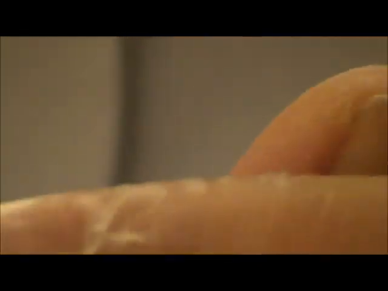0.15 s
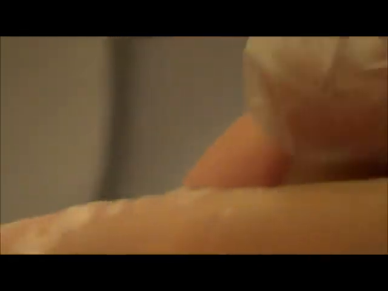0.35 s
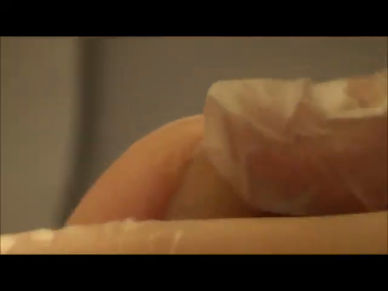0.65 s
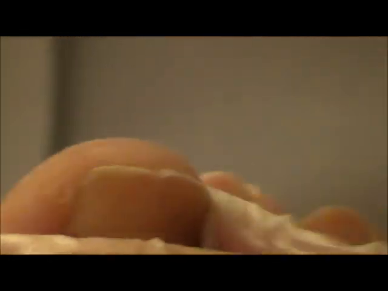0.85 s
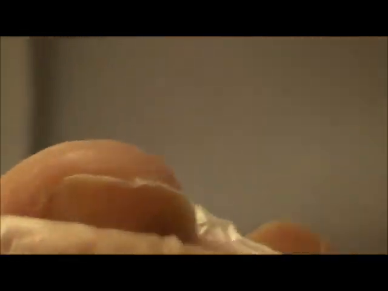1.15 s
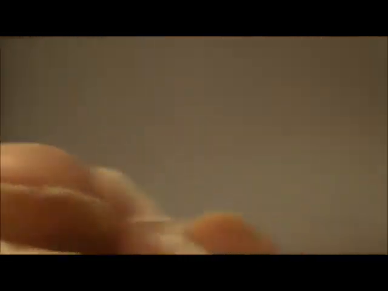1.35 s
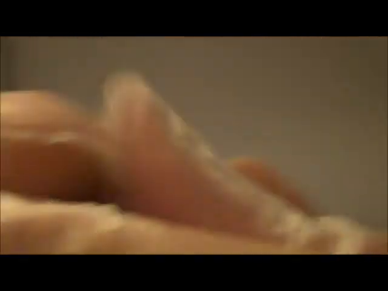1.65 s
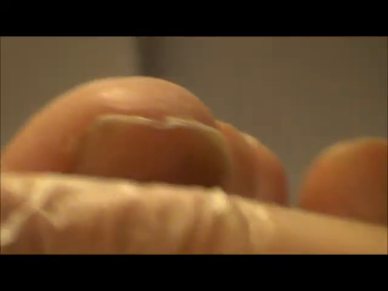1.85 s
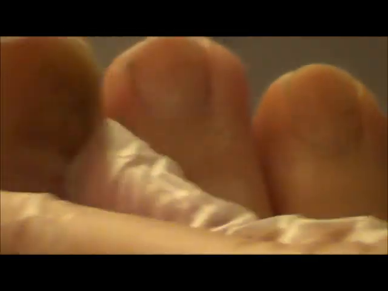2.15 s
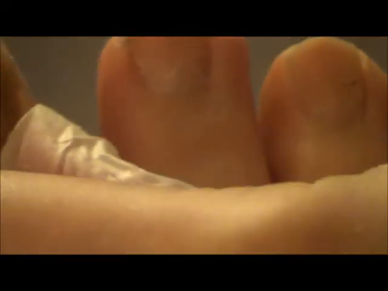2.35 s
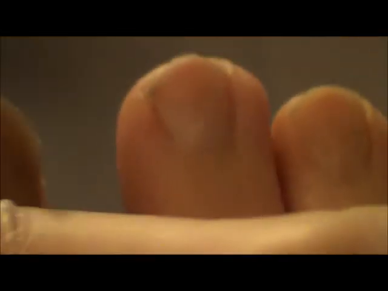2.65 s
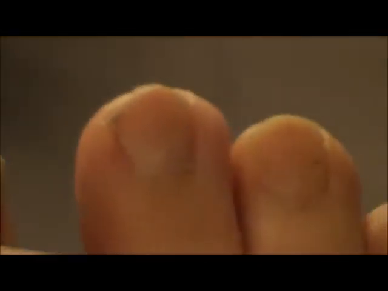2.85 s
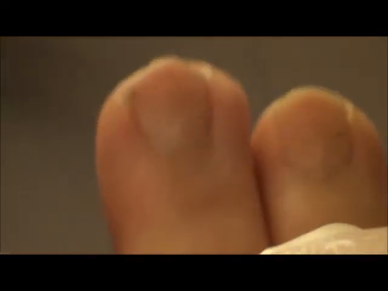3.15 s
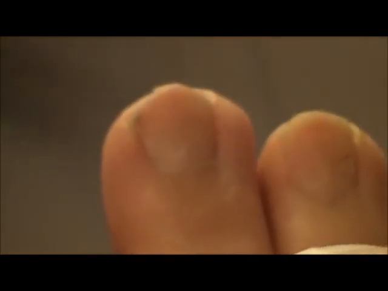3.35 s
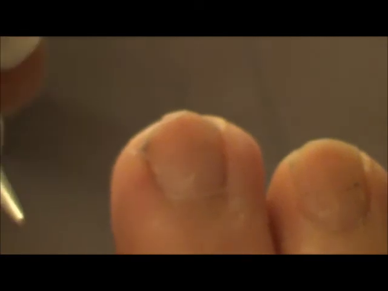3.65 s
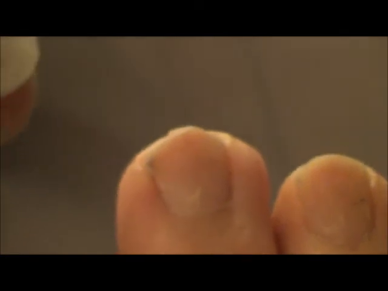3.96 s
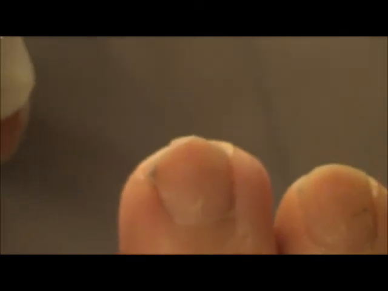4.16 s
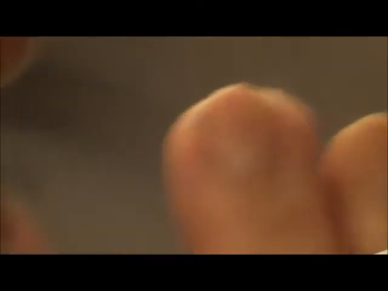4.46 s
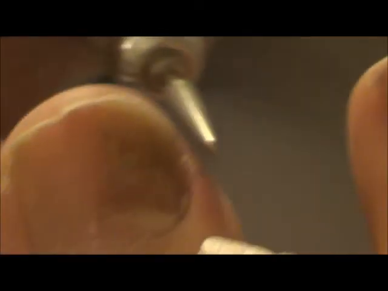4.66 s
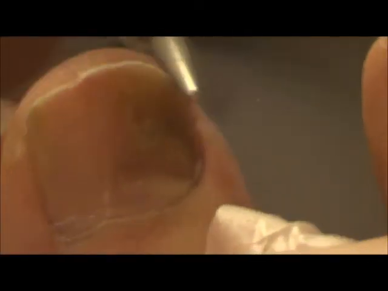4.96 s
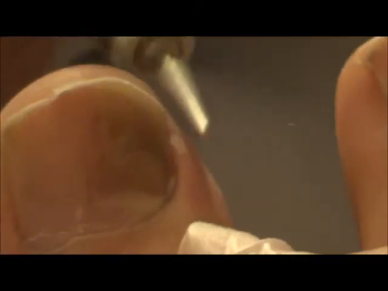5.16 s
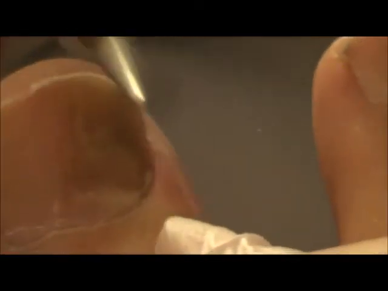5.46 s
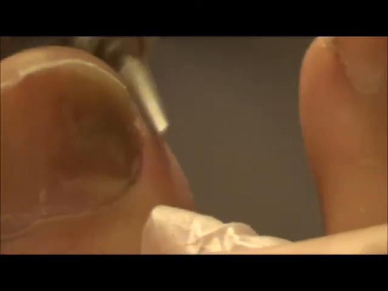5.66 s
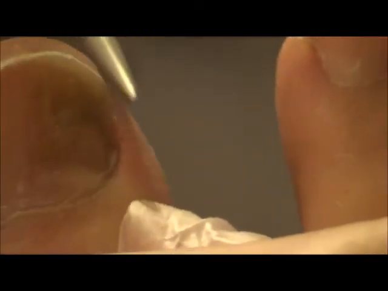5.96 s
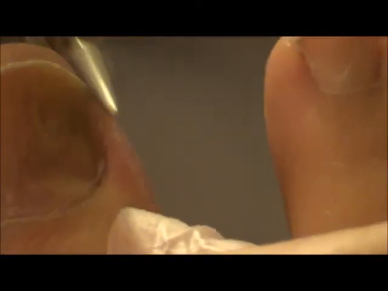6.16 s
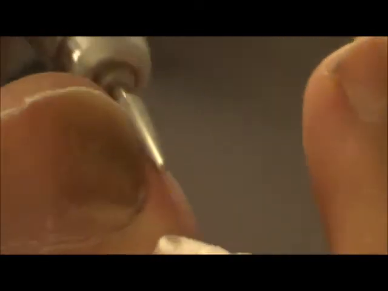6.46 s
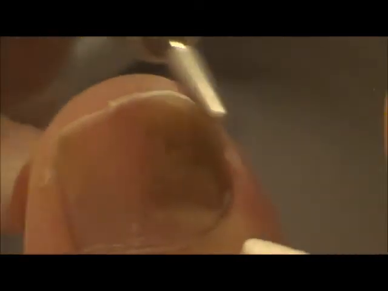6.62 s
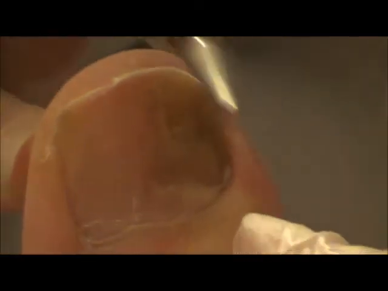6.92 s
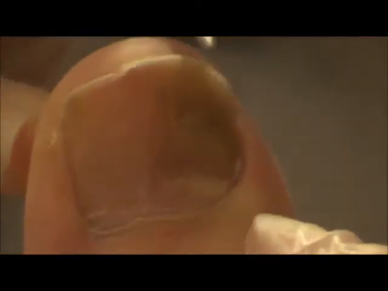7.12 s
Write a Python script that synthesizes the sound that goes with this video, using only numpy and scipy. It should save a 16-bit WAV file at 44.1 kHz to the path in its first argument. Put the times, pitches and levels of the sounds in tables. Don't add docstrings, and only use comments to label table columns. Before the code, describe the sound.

A small electric nail drill runs free close to the microphone in a quiet indoor room, a thin, bright, hissing whine wavering slightly in colour. A loud sharp tick briefly ducks the level before three seconds. From just after four seconds the burr strokes a toenail seven times, each adding a gritty rasp while the motor sags and recovers. Faint room rumble lies beneath.

```python
import sys
import numpy as np
from scipy import signal
from scipy.fft import rfft, irfft, next_fast_len
from scipy.io import wavfile
from scipy.ndimage import uniform_filter1d, map_coordinates

SR = 44100
rng = np.random.default_rng(int(sys.argv[2]) if len(sys.argv) > 2 else 0)


def persist_wave(psi):
    counts = np.round(np.clip(psi, -1, 1) * 32767).astype(np.int16)
    wavfile.write(sys.argv[1], SR, np.atleast_2d(counts).T)


def amplitude_ratio(level_db):
    exponent = np.asarray(level_db, float) / 20
    return 10 ** exponent


N = 321489
T = np.arange(N) / SR

# multiple_of_shaft_rate, held_free_db, stroking_db
LOW_ORDERS = [(1, -64.0, -61.0), (2, -66.0, -60.0), (3, -41.0, -37.0), (4, -54.0, -49.0), (5, -36.0, -39.5),
              (6, -48.0, -44.0), (7, -37.5, -36.0), (8, -61.0, -49.0), (9, -40.0, -44.0),
              (10, -47.0, -43.0), (11, -35.0, -43.5), (12, -38.0, -42.0), (13, -34.5, -31.5),
              (14, -35.0, -36.0), (15, -31.0, -30.0), (16, -46.5, -42.0), (17, -37.5, -43.0),
              (18, -44.0, -52.0), (19, -43.0, -44.0), (20, -45.0, -50.0), (21, -41.0, -39.0)]
# multiple_of_shaft_rate, held_free_db, stroking_db
HIGH_ORDERS = [(22, -49.0, -48.0), (23, -41.0, -42.0), (24, -44.0, -42.0), (25, -37.0, -38.5),
               (26, -46.5, -44.0), (27, -42.0, -41.0), (28, -44.0, -47.0), (29, -38.0, -38.0),
               (30, -37.0, -42.0), (31, -32.0, -38.0), (32, -35.0, -42.0), (33, -38.0, -38.0),
               (34, -55.0, -45.0), (35, -54.0, -49.0), (36, -50.0, -48.0), (37, -56.0, -52.0),
               (38, -54.0, -54.0), (39, -51.0, -52.0), (40, -49.0, -50.0), (41, -47.0, -52.0),
               (42, -49.0, -52.0)]
# multiple_of_shaft_rate, per_turn_db, per_tilt_db, per_roll_db
BEAMING = [(3, -2.7, -5.2, 0.7), (5, 4.5, -0.8, -0.9), (6, -2.0, 4.5, 0.1), (7, 4.2, -1.0, 1.0),
           (9, 2.6, -2.1, 0.7), (10, -2.1, 0.9, 0.8), (11, 3.4, -0.0, 0.5), (12, 1.4, 2.9, -1.7),
           (13, -1.2, -2.8, -1.5), (14, 0.5, -1.8, 2.3), (15, -1.8, -0.2, -0.9), (16, -0.3, 1.2, -0.9),
           (17, -0.9, -0.1, 0.2), (18, 1.2, 1.7, 0.8), (19, 2.4, 0.9, 0.2), (20, 1.6, -0.5, 1.5),
           (21, -0.7, 0.4, 0.5), (23, -3.2, -0.4, 3.4), (24, 2.6, 0.2, 2.9), (25, 2.3, -2.2, -2.7),
           (26, 1.5, 0.1, -0.9), (27, -0.1, -1.1, -0.0), (28, 1.2, 2.0, 1.7), (29, 0.4, 3.3, -1.3),
           (30, 0.7, -0.6, -0.3), (31, 2.2, -0.5, -0.2), (32, -0.7, -0.2, 1.6), (33, -0.8, -2.0, -2.5)]
# multiple_of_ball_pass_rate, sideband_in_shaft_rates, level_db
FRONT_BEARING = [(1, -1, -48.0), (1, 0, -39.0), (1, 1, -38.0), (1, 2, -38.0), (1, 3, -47.0), (1, 4, -55.0),
                 (1, 5, -53.0), (2, -2, -52.0), (2, 0, -42.0), (2, 1, -47.0), (2, 2, -48.0), (2, 3, -48.0),
                 (2, 4, -44.0), (2, 5, -51.0), (4, -3, -52.0), (4, -2, -48.0), (4, -1, -55.0),
                 (4, 0, -47.0), (4, 1, -49.0), (4, 2, -48.0), (4, 3, -50.0), (4, 4, -52.0), (4, 5, -55.0),
                 (5, -3, -53.0), (5, -2, -49.0), (5, -1, -54.0), (5, 0, -51.0), (5, 1, -55.0)]
# multiple_of_shaft_rate, level_db
REAR_BEARING = [(9.27, -61), (13.27, -48), (14.27, -47)]
# time_s, shaft_hz, then turn, tilt, roll in typical swings
WRIST_PATH = [(0.0, 366.21, 1.06, -0.64, -1.57), (0.3, 365.97, 1.12, -0.41, -1.53),
              (0.55, 366.24, 0.67, -0.34, -0.49), (0.75, 367.12, -0.24, 0.49, 1.68),
              (1.05, 366.93, -0.0, 0.15, 1.56), (1.4, 366.11, 1.01, 0.51, 1.07),
              (1.65, 365.55, 1.52, 0.31, -1.46), (1.85, 366.22, 1.54, 1.05, 0.73),
              (2.05, 366.5, 0.02, 2.08, -1.16), (2.25, 366.53, -0.7, 1.63, -0.66),
              (2.45, 366.0, -2.23, 0.87, -0.04), (2.7, 365.74, -1.47, 0.19, -0.71),
              (2.95, 366.63, -0.79, -0.67, 0.42), (3.2, 367.56, -1.37, -0.76, -0.77),
              (3.4, 367.51, -0.21, -2.18, -1.11), (3.65, 367.08, 0.31, -1.23, 0.75),
              (4.05, 367.15, 0.24, -0.96, 1.64)]
# touch_s, firmest_s, lift_s, rasp_db
STROKES = [
    (4.275, 4.435, 4.555, -20),
    (4.805, 4.965, 5.075, -21),
    (5.33, 5.445, 5.545, -21),
    (5.715, 5.85, 5.915, -20.5),
    (6.075, 6.2, 6.285, -21),
    (6.46, 6.55, 6.655, -21),
    (6.85, 6.945, 7.105, -21.5),
]
# slowest_s, half_length_s, sag_hz
SAGS = [
    (4.463, .317, 16),
    (4.985, .281, 14.3),
    (5.458, .262, 17.7),
    (5.843, .233, 16.6),
    (6.215, .231, 19.2),
    (6.589, .204, 20.4),
    (7.018, .283, 22.9),
]
# frequency_hz, density_db
HISS_COLOUR = [(290, -57), (500, -14.5), (1110, -6), (1360, -7), (1570, -4.5), (1720, -6), (1900, -1.5),
               (2610, -9.5), (2850, -4.5), (3200, -4), (5310, -3), (5880, -10), (11300, -12), (13300, -17),
               (16000, -17)]
# centre_hz, width_hz, lift_db
SHELL = [(1055, 313, 8.5), (2980, 340, -8)]
# frequency_hz, density_db
RASP_COLOUR = [(470, -55), (800, -52), (929, -23), (1030, -11), (1120, -38), (1380, -20), (1610, -36),
               (1800, -1), (2450, -7), (2920, -9), (3030, -8.5), (4690, -1), (6250, -6.5), (10400, -5),
               (15700, -15.5)]
# centre_hz, width_hz, lift_db
NAIL_EDGE = [(11830, 1600, 8.5), (13600, 1106, -3.5), (11000, 490, 6)]
# start_s, peak_db, ring_hz, brightness_db
TICKS = [
    (2.7217, -.5, 4740, -3),
    (4.5144, -8, 2220, -6),
]
# frequency_hz, density_db
ROOM_COLOUR = [(15, -47), (25, -3), (65, -10), (255, -3.5), (335, -5), (361, -0.5), (395, -4), (525, -6),
               (600, -9), (900, -11), (1170, -37), (1980, -120)]
# frequency_hz, side_minus_mid_db
WIDTH = [(60, -55), (120, -23), (250, -26), (600, -16), (1290, -27.5), (2380, -20), (4400, -18),
         (8120, -14.5), (11900, -21), (12600, -45)]

BALL_PASS = 4.3435
STROKES_FROM_S, SETTLE_S = 4.05, .06
RESTING_HZ, TIRING_HZ_PER_S, FULL_SAG_HZ, SAG_SHARPNESS = 363.1, -.43, 18, 3.5


def whine(turns, pose):
    busy = stroking()
    beams = {int(round(order)): beam for order, *beam in BEAMING}
    load_lift_db = 2 * sag() / FULL_SAG_HZ
    out = 0
    for order, free_db, stroke_db in [*LOW_ORDERS, *HIGH_ORDERS]:
        order = int(round(order))
        spread_db = .9 * (1 + order / 25 if order in beams else 3)
        wander_db = spread_db * walk(1.5 + order / 9)
        beam_db = np.dot(beams.get(order, np.zeros(3)), pose)
        slow_db = (1 - busy) * (free_db + wander_db + beam_db)
        quick_db = busy * (stroke_db - 0.8 + load_lift_db + 2.2 * walk(13))
        shimmer_db = (1 + order / 30 + busy * (1.2 + order / 24)) * walk(45)
        slip_cycles = busy * (.02 + order / 280) * walk(45)
        out = out + tone(order * turns + slip_cycles, shimmer_db + slow_db + quick_db)
    return out


def bearing(turns, tilt):
    busy, load = stroking(), sag() / FULL_SAG_HZ
    resting_db, loaded_db = 4, -10
    pass_db = (1 - busy) * 1.9 * tilt + busy * (resting_db + load * (loaded_db - resting_db))
    sides_db = 1 - busy + busy * (1 + load)
    tones = []
    for multiple, side, db in FRONT_BEARING:
        carrier_db = pass_db - 8 * busy * (multiple - 1)
        tones.append((multiple * BALL_PASS + side, db + (sides_db if side else carrier_db)))
    out = 0
    for rate, db in [*tones, *REAR_BEARING]:
        out = out + tone(rate * turns, db + 1.6 * walk(1.3) + 1.2 * walk(12))
    return out


def hiss(turns, turn):
    rough = rng.standard_normal(N) * (1 + 0.18 * np.cos(2 * np.pi * turns))
    rough = rough + 0.2 * per_turn(turns, memory=1.0)
    level_db = -30 + 0.8 * stroking() - 0.07 * stroking() * turn
    return level(colour(rough, HISS_COLOUR, SHELL), 0) * amplitude_ratio(level_db)


def rasp(turns):
    fizz_db, firm = pressure()
    press_db = uniform_filter1d(fizz_db, size=600) - 30 * (1 - stroking())
    light_body_db, firm_body_db = 5.5, 0
    body_db = light_body_db + firm * (firm_body_db - light_body_db)
    grit = rng.standard_normal(N) * (1 + 0.22 * np.cos(2 * np.pi * turns)) * amplitude_ratio(1.8 * walk(500))
    teeth = level(grit, 0) + .7 * per_turn(turns, memory=.85)
    raw = level(colour(teeth, RASP_COLOUR, NAIL_EDGE), 11.9)
    edges_hz = 700 * np.sqrt(2) ** np.arange(10)
    out = 0
    for lo_hz, hi_hz in zip(edges_hz, edges_hz[1:]):
        band = signal.sosfilt(signal.butter(2, [lo_hz, hi_hz], "band", fs=SR, output="sos"), raw)
        body_share = np.clip(np.log2(12000 / hi_hz) / 0.81, 0, 1)
        out = out + band * amplitude_ratio(body_share * body_db + .8 * walk(30))
    return out * amplitude_ratio(press_db + .8 * walk(50))


def ticks():
    out, t = np.zeros(N), T[:400]
    for start_s, peak_db, ring_hz, bright_db in TICKS:
        crack = np.sin(2 * np.pi * 9300 * t) + np.sin(2 * np.pi * 6400 * t)
        crack = crack * np.exp(-(t / 0.0004) ** 2)
        ring = np.sin(2 * np.pi * ring_hz * t * (.9 + 45 * t)) * np.exp(-((t - .001) / .0007) ** 2)
        knock = .3 * np.sin(2 * np.pi * 1850 * t) * np.exp(-((t - .0017) / .0007) ** 2)
        grit = .45 * np.convolve(rng.standard_normal(402), [1, 0, -1], "valid") * np.exp(-t / .0011)
        start = int((start_s + .0005) * SR)
        blow = amplitude_ratio(bright_db) * (crack + grit) + 0.6 * ring + knock
        out[start:start + 400] += amplitude_ratio(peak_db + 1.0) * blow
    return signal.sosfilt(signal.butter(2, 900, "high", fs=SR, output="sos"), out)


def wrist():
    time_s, *motions = np.transpose(WRIST_PATH)
    return [np.interp(T, time_s, motion) for motion in motions]


def stroking():
    return np.clip((T - STROKES_FROM_S) / SETTLE_S, 0, 1)


def sag():
    out = 0
    for slowest_s, half_s, sag_hz in SAGS:
        phase = np.pi / 2 * np.clip((T - slowest_s) / half_s, -1, 1)
        out = out + sag_hz * np.cos(phase).clip(0) ** SAG_SHARPNESS
    return out


def pressure():
    off_db, touch_db, lift_db = -31, -11, -10.5
    shapes = []
    for touch_s, firm_s, lift_s, _ in STROKES:
        times_s = [touch_s - .03, touch_s, firm_s, lift_s, lift_s + .05]
        shapes.append(np.interp(T, times_s, [off_db, touch_db, 0, lift_db, off_db]))
    shapes = np.array(shapes)
    levels_db = shapes + np.array(STROKES)[:, 3:]
    return levels_db.max(axis=0), amplitude_ratio(shapes.max(axis=0))


def walls(x):
    t, t60_s = T[:SR // 3], .25
    tail = rng.standard_normal(SR // 3) * amplitude_ratio(-60 * t / t60_s) * (t > .002)
    return signal.fftconvolve(x, tail / np.sqrt(np.sum(tail ** 2)))[:N]


def room_rumble():
    return level(colour(rng.standard_normal(N), ROOM_COLOUR), -50.5)


def hum():
    return tone(199 * T, -67.5)


def scan_tone():
    line_hz, field_hz = 15625, 50
    throb = 1 + .4 * np.cos(2 * np.pi * field_hz * T) + .45 * np.cos(2 * 2 * np.pi * field_hz * T)
    return throb * tone(line_hz * T, -41 + .8 * walk(2.6))


def level(x, db):
    return x * amplitude_ratio(db) / np.sqrt(np.mean(x ** 2))


def colour(x, points, peaks=()):
    size = next_fast_len(len(x))
    hz = np.maximum(np.arange(size // 2 + 1) * SR / size, 1)
    points_hz, points_db = np.array(points).T
    db = np.interp(np.log(hz), np.log(points_hz), points_db)
    for centre_hz, width_hz, lift_db in peaks:
        db = db + lift_db / (1 + (2 * (hz - centre_hz) / width_hz) ** 2)
    return irfft(rfft(x, size) * amplitude_ratio(db), size)[:len(x)]


def walk(rate_hz):
    knots = rng.standard_normal(int(T[-1] * rate_hz) + 2)
    return map_coordinates(knots, [T * rate_hz], order=2, prefilter=False) * 1.35


def per_turn(turns, memory, size=96):
    fresh = rng.standard_normal((3000, size))
    rows = signal.lfilter([1], [1, -min(memory, .995)], fresh, axis=0)
    return level(map_coordinates(rows[200:].ravel(), [turns * size], order=2), 0)


def tone(cycles, db):
    return np.sqrt(2) * amplitude_ratio(db) * np.sin(2 * np.pi * (cycles + rng.random()))


def scene():
    free_hz, *pose = wrist()
    loaded_hz = RESTING_HZ + TIRING_HZ_PER_S * (T - STROKES_FROM_S) - sag()
    turns = np.cumsum(free_hz + stroking() * (loaded_hz - free_hz)) / SR
    motor = whine(turns, np.array(pose)) + bearing(turns, pose[1])
    air = hiss(turns, pose[0])
    tap = ticks()
    contact = rasp(turns) + tap
    reflected = walls(motor * amplitude_ratio(7 * stroking()) + contact)
    near = amplitude_ratio(-0.23) * motor + amplitude_ratio(1.0) * air + contact + amplitude_ratio(-15) * reflected
    mid = near + room_rumble() + hum()
    spread = walls(motor + 0.95 * air + 0.8 * contact + tap)
    side = colour(spread + 2.0 * room_rumble() + 0.15 * mid, WIDTH)
    return np.array([mid + side, mid - side])


def band_limit(x):
    return signal.sosfilt(signal.butter(12, 16690, fs=SR, output="sos"), x)


def record(dry):
    since_s = T - TICKS[0][0]
    ahead_db = -7.0 * np.exp(-((since_s + 0.0006) / 0.00051) ** 2)
    after_db = -3.2 * np.clip(since_s / 0.0029, 0, 1) * np.exp(-np.abs(since_s) / .45)
    wired = np.clip(dry * amplitude_ratio(ahead_db + after_db), -1, 1) + scan_tone()
    bass_cut = signal.butter(2, 28, "high", fs=SR, output="sos")
    top_cut = signal.ellip(12, .5, 60, 15745, fs=SR, output="sos")
    wired = signal.sosfilt(bass_cut, wired)
    return band_limit(signal.sosfiltfilt(top_cut, wired))


dry = scene()
out = record(dry)
persist_wave(out)
```